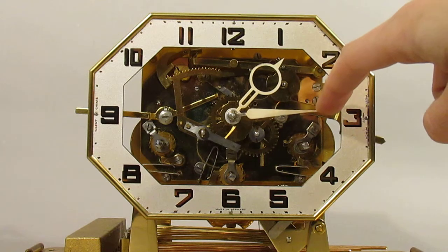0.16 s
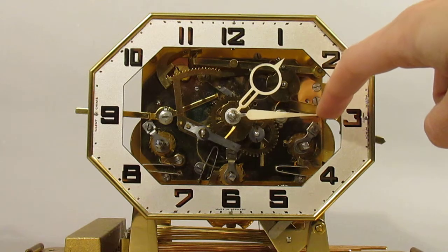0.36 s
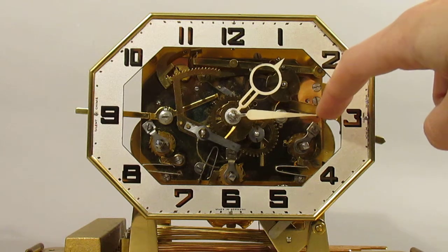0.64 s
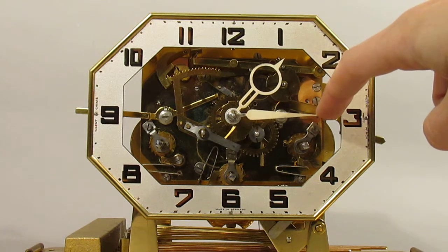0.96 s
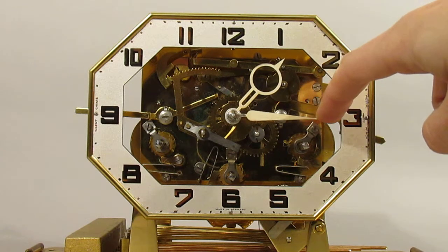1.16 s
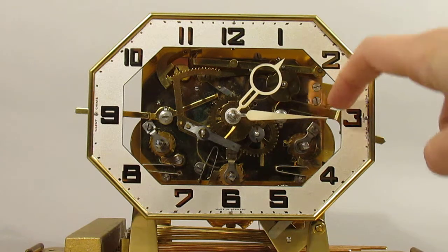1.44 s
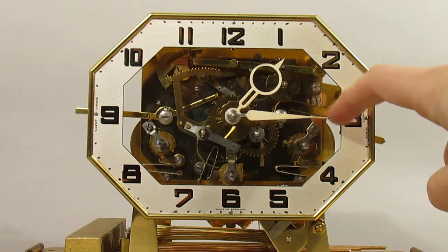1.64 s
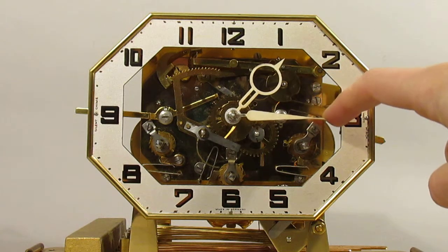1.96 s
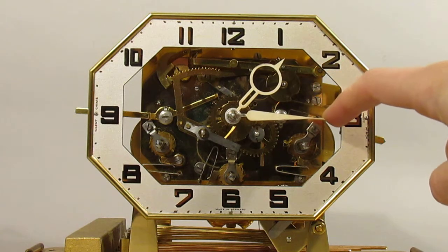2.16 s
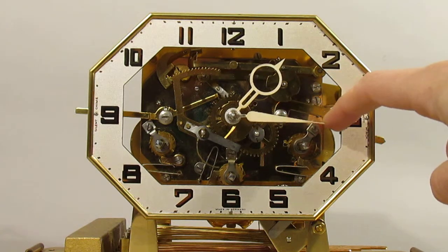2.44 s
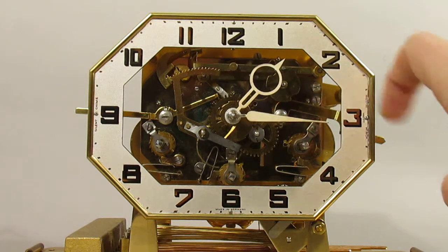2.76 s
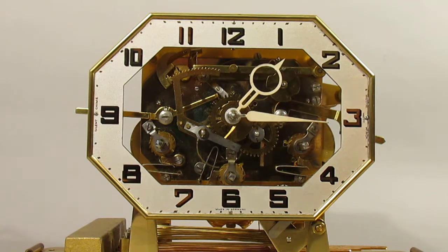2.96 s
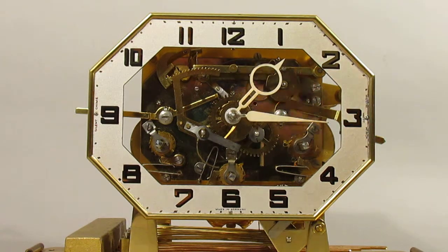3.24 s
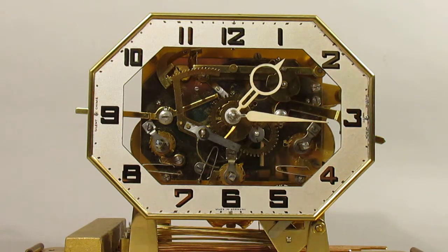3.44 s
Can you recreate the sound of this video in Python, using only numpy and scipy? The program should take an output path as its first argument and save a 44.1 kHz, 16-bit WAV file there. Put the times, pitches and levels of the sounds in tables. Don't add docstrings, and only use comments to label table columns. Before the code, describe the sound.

A clock movement ticks and ratchets, a lever snaps, and small gears whir up to speed

```python
import sys
import numpy as np
from scipy import signal
from scipy.fft import rfft, irfft, next_fast_len
from scipy.io import wavfile
from scipy.ndimage import uniform_filter1d

SR = 44100
rng = np.random.default_rng(int(sys.argv[2]) if len(sys.argv) > 2 else 0)


def gain_from_decibels(decibels):
    exponent = np.asarray(decibels, float) / 20
    return 10 ** exponent


def dump_mix(stems):
    frames = np.atleast_2d(stems).T
    limited = np.clip(frames, -1, 1)
    pcm = np.round(limited * 32767).astype(np.int16)
    wavfile.write(sys.argv[1], SR, pcm)


N = 158319
T = np.arange(N) / SR

# freq_hz, density_db_per_hz
RUMBLE_COLOUR = [(12, -43), (20, -9.5), (48, -3.5), (86, -9.5), (123, 1.5), (147, -14), (195, -8.5),
                 (353, -14.5), (700, -31), (910, -64), (1540, -120)]
# freq_hz, density_db_per_hz
HISS_COLOUR = [(290, -34), (500, -2), (699, -1.5), (1150, -2.5), (2210, -9.5), (2490, -5.5), (2710, -10.5),
               (9640, -13), (16300, -19)]
# freq_hz, likeness_-1_to_1
AIR_LIKENESS = [(60, 0.34), (180, 0.35), (550, -0.13), (1650, 0.25), (4970, -0.29), (15000, 0.42)]
# freq_hz, left_minus_right_db
ROOM_BALANCE = [(60, 3), (400, 0), (2400, -2.5), (5000, 0)]
# freq_hz, width_hz, rms_db, left_right_likeness
APPLIANCE_TONES = [(41.5, 12, -84, 0.2), (119.2, 5.2, -59.5, 0.4), (199.5, 6, -63, 0.5),
                   (1183, 23, -75.5, 0.02), (1620, 38, -77, -1.5), (2477, 20, -76.5, 0.24),
                   (15500, 2.9, -113, 0.24)]
RUMBLE_DB, HISS_DB, HISS_TOP_HZ = -51, -61.5, 15850

# peak_s, rise_s, t60_s, level_db, brightness_0_to_1
RUBS = [
    (1.56, .02, 0.11, -60, 0.7),
    (1.587, 0.014, 0.041, -55, 0.66),
    (1.665, 0.021, 0.099, -55, 0.55),
    (1.74, 0.018, 0.13, -63.5, 0.5),
    (2.394, 0.0016, 0.38, -52, 0.86),
    (2.508, 0.0048, 0.12, -49, 0.87),
    (1.598, 0.0075, 0.046, -65.5, 0.23),
    (2.905, .005, .06, -65, .8),
    (3.245, .003, 0.37, -55.5, 0.9),
    (3.585, 0.023, .2, -55.5, 0.9),
]
# freq_hz, width_hz, level_db
RUB_LOW_MODES = [(2420, 1500, -4.5), (3440, 770, 4), (4340, 390, 5), (5540, 630, -5.5)]
# freq_hz, width_hz, level_db
RUB_HIGH_MODES = [(6170, 3000, -13), (7500, 570, -4), (8570, 570, -3), (9960, 1750, -5),
                  (13000, 2000, -9.5)]
# start_s, peak_db, ring_hz, t60_s
TICKS = [(1.5834, -51, 12200, .025), (1.655, -55, 10600, .08), (1.668, -53, 10700, .05),
         (2.3935, -44, 8500, .01), (2.5045, -32, 11500, .004), (2.5047, -36, 5900, .007),
         (2.5095, -36, 9800, .004), (2.5105, -41, 7400, .006), (2.484, -47, 9000, .035),
         (2.467, -44, 13100, .02), (3.244, -45, 8500, .008), (3.246, -59, 6300, .12), (3.25, -61, 6750, .1),
         (3.573, -58, 6400, .04), (3.576, -57, 7400, .04), (3.4115, -48, 3000, .006),
         (3.419, -55, 4050, .05)]

# start_s, pawl_db, spring_db, tip_db, frame_db
RATCHET_TEETH = [(2.4476, -29, -36, -46, -45), (2.4736, -31, -44, -44, -43), (2.4995, -38, -42, -49, -48),
                 (2.5229, -43, -52, -56, -59), (2.5452, -36.5, -52, -53, -49.5),
                 (2.5652, -37, -54, -48, -53), (2.5841, -37, -49, -49, -48.5),
                 (2.6005, -37, -49, -39, -46.5), (2.6157, -32.5, -45, -50, -48),
                 (2.6301, -35.5, -47, -44, -47.5), (2.6446, -42, -48, -54, -48),
                 (2.656, -40, -49, -51, -46.5), (2.6688, -38.5, -45, -56, -46.5),
                 (2.6796, -56, -63, -63, -59), (2.6908, -44, -55, -55, -46), (2.702, -40.5, -52, -55, -47),
                 (2.7106, -58, -64, -55, -50), (2.7204, -46.5, -63, -59, -53), (2.7299, -57, -72, -69, -54),
                 (2.745, -59, -73, -69, -68), (2.7554, -60, -75, -65, -64)]
# freq_hz, width_hz, level_db
PAWL_MODES = [(9950, 540, -7), (10780, 230, -2)]
# freq_hz, width_hz, level_db
SPRING_MODES = [(11860, 180, -3.5), (13100, 400, -5.5)]
# freq_hz, width_hz, level_db
TIP_MODES = [(14500, 520, -4)]
# freq_hz, width_hz, level_db
FRAME_MODES = [(3110, 420, -5.5), (4010, 290, -5.5), (5350, 320, -8.5), (6420, 230, -5), (8230, 600, -8.5)]
PAWL_LAG_S, PAWL_DB, SPRING_DB, TIP_DB, FRAME_DB = .0007, 26, 35.5, 36, 30

# freq_hz, density_db_per_hz
SNAP_COLOUR = [(180, -10), (300, -1), (2170, -13.5), (3080, -7), (5520, -5.5), (7500, 2.5), (8940, 0),
               (13500, 4.5), (16000, -20)]
# delay_s, freq_hz, level_db, rise_s, t60_s
CASE_MODES = [
    (0, 304, -42, 0.0074, 0.14),
    (.02, 247.4, -39, 0.0055, 0.15),
    (0.091, 101.5, -33.5, 0.013, 0.19),
    (0.152, 66, -35.5, 0.057, 0.37),
    (0.222, 93.7, -40, .02, 0.36),
]
# delay_s, freq_hz, level_db, rise_s, t60_s
ROD_MODE = (.012, 1406, -39, .03, .2)
SNAP_S, SNAP_DB, SNAP_HZ, SNAP_T60_S, CAUGHT_S = 2.45809, -12, 9000, .007, .00056
CHATTER_LAG_S, CHATTER_DB, CHATTER_T60_S = .0022, -26, .012
SNAP_TOP_HZ = 15100
SHUDDER_S, SHUDDER_HIGH_DB, SHUDDER_LOW_DB = 0.054, -49, -54.5

# time_s, teeth_passed
TEETH_PASSED = [(2.7465, 0), (2.7822, 2), (2.8691, 8), (2.9625, 16), (3.0602, 26), (3.1635, 38),
                (3.2546, 50), (3.3509, 64), (3.4281, 76), (3.522, 91), (3.563, 98)]
# time_s, plate_drive_db, pinion_drive_db
TRAIN_LOAD = [(2.74, -64.5, -86), (2.81, -62, -71.5), (2.9, -60, -68), (2.935, -60.5, -66.5),
              (3.07, -59, -67.5), (3.22, -57, -66), (3.36, -56.5, -66.5), (3.43, -61.5, -68.5),
              (3.52, -63.5, -67), (3.59, -61, -72)]
# freq_hz, width_hz, level_db
PLATE_MODES = [(2020, 350, -2), (2096, 114, 3), (2690, 176, 0), (3370, 93, 1), (3490, 170, -2),
               (4070, 200, -0.5), (4510, 180, -2.5), (5350, 240, 2), (6370, 170, -6), (7060, 960, -7.5)]
# freq_hz, width_hz, level_db
PINION_MODES = [(10000, 610, -6.5), (10050, 170, -1), (10930, 600, -11.5), (11900, 400, -7.5)]
LEAF_DB = [0, 1, -.5, 0, 2.3, -2, 0]
MESH_LAG_S, MESH_JITTER_S, MESH_T60_S = .0002, .00018, .006
MESH_ROUGH, REBOUND, BEARING = .1, .1, .024
NULL_HZ, NULL_WIDTH_HZ = 5450, 480

# freq_hz, left_minus_right_db
CLOCK_BALANCE = [(2000, -1), (5000, -2), (7200, 2.5), (11000, 4), (14000, 3.5)]
# freq_hz, t60_s
WALL_DECAY = [(300, 0.76), (3000, 0.16), (12000, 0.032)]
PORT_LEAD_S, WALL_DB, WALL_BRIGHT_HZ = .000016, -9, 9000


def unit(x):
    return x / np.sqrt(np.mean(x ** 2) + 1e-20)


def along(points, hz):
    f, value = np.transpose(points)
    return np.interp(np.log(hz + 1), np.log(f + 1), value)


def filtered(x, response):
    size = next_fast_len(N + SR // 2)
    spectrum = rfft(x, size) * response(np.fft.rfftfreq(size, 1 / SR))
    return irfft(spectrum, size)[..., :N]


def resonant(x, modes, broad_db=-40):
    def response(f):
        total = gain_from_decibels(broad_db) * 1j * f / (1500 + 1j * f)
        for k, (hz, width_hz, db) in enumerate(modes):
            damping = 1j * f * width_hz
            total = total + (-1) ** k * gain_from_decibels(db) * damping / (hz * hz - f * f + damping)
        return total
    return filtered(x, response)


def stereo_noise(gain, likeness):
    def response(f):
        angle = np.arccos(np.clip(likeness(f), -1, 1)) / 2
        return gain(f) * np.array([np.cos(angle), np.sin(angle)])
    mid, side = filtered(rng.standard_normal((2, N)), response)
    return unit(np.array([mid + side, mid - side]))


def panned(x, balance, lead_s=0):
    def response(f):
        ratio = gain_from_decibels(along(balance, f)) * np.exp(2j * np.pi * f * lead_s)
        return ratio ** np.array([[.5], [-.5]])
    return filtered(x, response)


def swell(peak_s, rise_s, t60_s):
    rise = np.exp(-((T - peak_s) / rise_s) ** 2)
    return np.where(T < peak_s, rise, gain_from_decibels(-60 * np.abs(T - peak_s) / t60_s))


def grainy_noise(depth_db, grain_samples):
    waver = unit(uniform_filter1d(rng.standard_normal(N), size=grain_samples))
    return rng.standard_normal(N) * gain_from_decibels(depth_db * waver)


def ring(start_s, hz, rise_s, t60_s):
    t = np.clip(T - start_s, 0, None)
    return np.sin(2 * np.pi * hz * t) * gain_from_decibels(-60 * t / t60_s) * (1 - np.exp(-t / rise_s))


def contacts(times_s, gains, t60_s, bounce_s, bounce, rough):
    marks = np.zeros(N + SR)
    for delay_s, share in ((0, 1), (bounce_s, bounce)):
        np.add.at(marks, ((times_s + delay_s) * SR).astype(int), gains * share)
    blows = marks[:N]
    noise_level = signal.fftconvolve(blows, gain_from_decibels(-60 * T[:900] / t60_s))[:N]
    return blows + rough * noise_level * rng.standard_normal(N)


def room_air():
    air = 0
    for colour, db in ((RUMBLE_COLOUR, RUMBLE_DB), (HISS_COLOUR, HISS_DB)):
        points = [(6.8, -72), *colour, (colour[-1][0] * 1.3, -60)]
        noise = stereo_noise(lambda f: gain_from_decibels(along(points, f)), lambda f: along(AIR_LIKENESS, f))
        air = air + gain_from_decibels(db) * noise
    for hz, width_hz, db, like in APPLIANCE_TONES:
        tone = stereo_noise(lambda f: 1 / (1 + ((f - hz) / width_hz) ** 2), lambda f: like + 0 * f)
        air = air + gain_from_decibels(db) * tone
    return panned(air, ROOM_BALANCE)


def rubs():
    low = unit(resonant(grainy_noise(4.2, 60), RUB_LOW_MODES))
    high = unit(resonant(grainy_noise(4.2, 60), RUB_HIGH_MODES))
    out = np.zeros(N)
    for peak_s, rise_s, t60_s, db, bright in RUBS:
        out += gain_from_decibels(db) * swell(peak_s, rise_s, t60_s) * (bright * high + (1 - bright) * low)
    return out


def ticks():
    shaky = 1 + 0.82 * unit(uniform_filter1d(rng.standard_normal(N), size=70))
    crack = 0.61 * np.diff(rng.standard_normal(N + 1))
    out = np.zeros(N)
    for start_s, db, hz, t60_s in TICKS:
        mode = shaky * ring(start_s, hz, 0.00019, t60_s)
        out += gain_from_decibels(db) * (mode + swell(start_s, .0001, 0.0056) * crack)
    return out


def ratchet():
    start_s, pawl_db, spring_db, tip_db, frame_db = np.transpose(RATCHET_TEETH)
    parts = ((pawl_db + PAWL_DB, PAWL_MODES), (spring_db + SPRING_DB, SPRING_MODES),
             (tip_db + TIP_DB, TIP_MODES), (frame_db + FRAME_DB, FRAME_MODES))
    out = np.zeros(N)
    for db, modes in parts:
        flicks = contacts(start_s + PAWL_LAG_S, gain_from_decibels(db), .01, .0012, .4, rough=.18)
        out += resonant(flicks, modes, broad_db=-36)
    return out


def snap():
    caught = np.clip((SNAP_S + CAUGHT_S - T) / .0001, .2, 1)
    ping = 1.2 * ring(SNAP_S, SNAP_HZ, .00008, SNAP_T60_S) + .6 * ring(SNAP_S, 12800, .00012, .003)
    noise = unit(filtered(rng.standard_normal(N), lambda f: gain_from_decibels(along(SNAP_COLOUR, f))))
    chatter = noise * swell(SNAP_S + CHATTER_LAG_S, .0015, CHATTER_T60_S) * (T > SNAP_S)
    out = gain_from_decibels(SNAP_DB) * caught * ping + gain_from_decibels(CHATTER_DB) * chatter
    for delay_s, hz, db, rise_s, t60_s in [*CASE_MODES, ROD_MODE]:
        out += gain_from_decibels(db) * ring(SNAP_S + delay_s, hz, rise_s, t60_s)
    return out


def shudder():
    on = np.clip(np.minimum(T - SNAP_S, SNAP_S + SHUDDER_S - T) / .006, 0, 1)
    waver = gain_from_decibels(2 * unit(uniform_filter1d(rng.standard_normal(N), size=90)))
    grain = rng.standard_normal((2, N)) * waver
    high = unit(resonant(grain[0], [*RUB_LOW_MODES, *RUB_HIGH_MODES]))
    low = unit(resonant(grain[1], [(494, 480, -1), (970, 740, 0.5), (2140, 160, -6)]))
    fading_db = SHUDDER_HIGH_DB - 60 * (T - SNAP_S) * on / 0.86
    return on * (gain_from_decibels(fading_db) * high + gain_from_decibels(SHUDDER_LOW_DB) * low)


def train():
    at_s, count = np.transpose(TEETH_PASSED)
    running = T > at_s[0]
    passed = np.polynomial.Polynomial.fit(at_s, count, deg=5)(T[running])
    new_tooth = np.diff(np.floor(passed + 1e-3), prepend=-1)
    times_s = T[running][np.flatnonzero(new_tooth)]
    luck = rng.standard_normal((len(times_s), 3))
    times_s = times_s + MESH_LAG_S + MESH_JITTER_S * luck[:, 0]
    leaf_db = np.resize(LEAF_DB, len(times_s))
    load_s, *drive_db = np.transpose(TRAIN_LOAD)
    out = np.zeros(N)
    for k, modes in enumerate((PLATE_MODES, PINION_MODES)):
        gains = gain_from_decibels(leaf_db + luck[:, 1 + k])
        knocks = contacts(times_s, gains, MESH_T60_S, 0.0023, REBOUND, rough=MESH_ROUGH)
        knocks = knocks + BEARING * rng.standard_normal(N) * running
        body = resonant(knocks, modes, broad_db=-28.5)
        out += body / np.std(body[T > 3]) * gain_from_decibels(np.interp(T, load_s, drive_db[k]) + 2.5)

    def notch(f):
        gap = NULL_HZ ** 2 - f * f
        return gap / (gap + 1j * f * NULL_WIDTH_HZ)
    return filtered(out, notch)


def walls(x):
    hz, t, z = signal.stft(rng.standard_normal((2, SR // 3)), SR, nperseg=256)
    decay = gain_from_decibels(-60 * t / along(WALL_DECAY, hz)[:, None])
    tail = signal.istft(z * decay, SR, nperseg=256)[1]
    delayed = np.pad(x, (30, 0))[None]
    return signal.fftconvolve(delayed, tail / np.linalg.norm(tail[0]), axes=1)[:, :N]


def scene():
    below_top = lambda f: f < HISS_TOP_HZ
    hits = filtered(snap(), lambda f: 1 / np.sqrt(1 + (f / SNAP_TOP_HZ) ** 40))
    soft = filtered(rubs() + ticks() + ratchet() + shudder() + train(), below_top)
    clock = hits + soft
    scattered = filtered(clock, lambda f: (1 + 1j * f / WALL_BRIGHT_HZ) * below_top(f))
    direct = panned(clock, CLOCK_BALANCE, PORT_LEAD_S)
    return direct + gain_from_decibels(WALL_DB) * walls(scattered) + filtered(room_air(), below_top)


def band_limit(x):
    return signal.sosfilt(signal.butter(12, 16510, fs=SR, output="sos"), x)


def record(dry):
    return band_limit(dry)


dry = scene()
out = record(dry)
dump_mix(out)
```